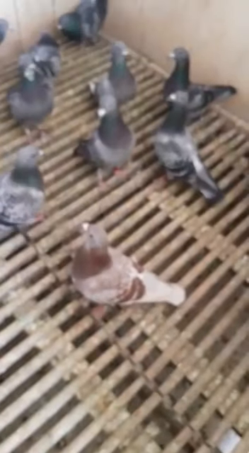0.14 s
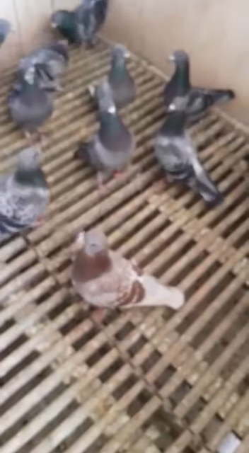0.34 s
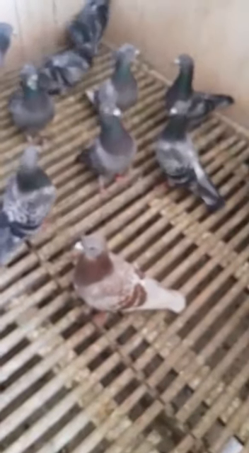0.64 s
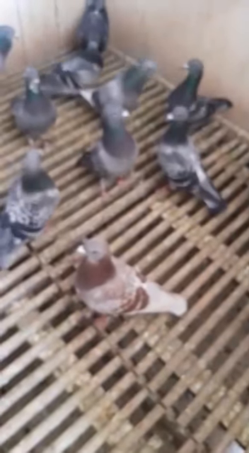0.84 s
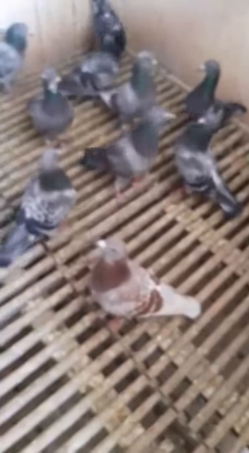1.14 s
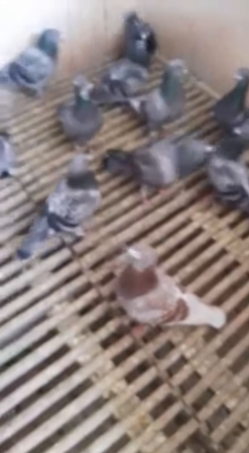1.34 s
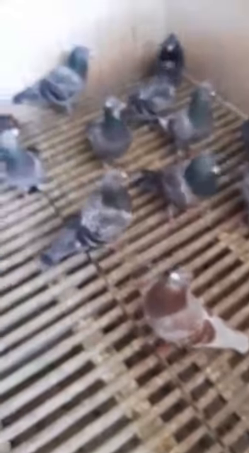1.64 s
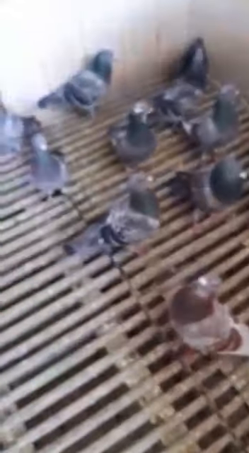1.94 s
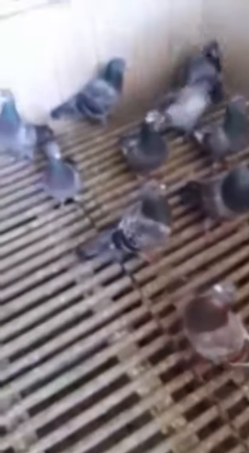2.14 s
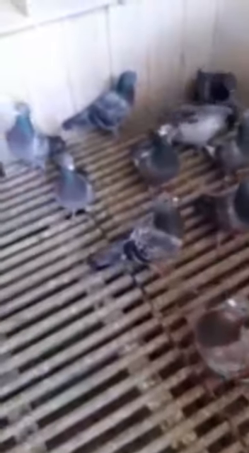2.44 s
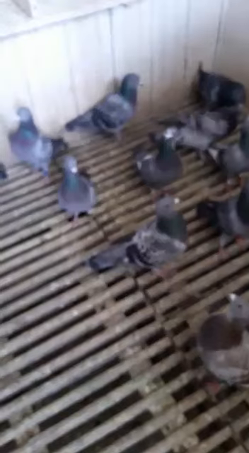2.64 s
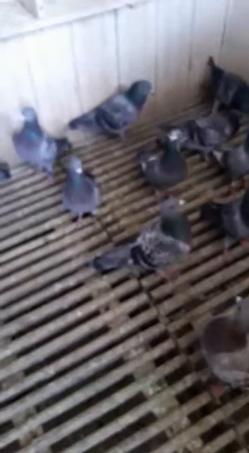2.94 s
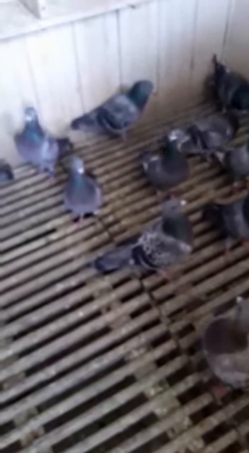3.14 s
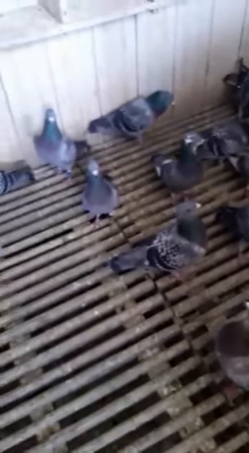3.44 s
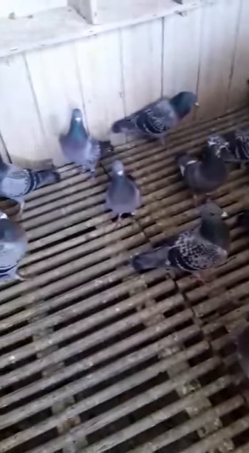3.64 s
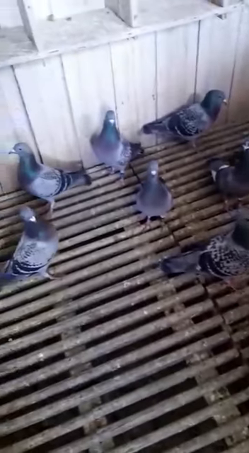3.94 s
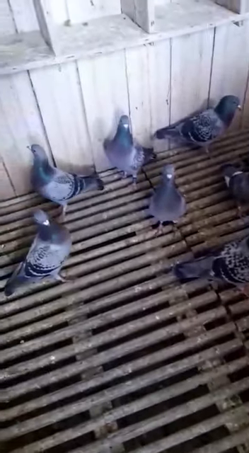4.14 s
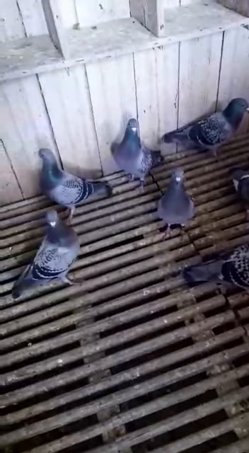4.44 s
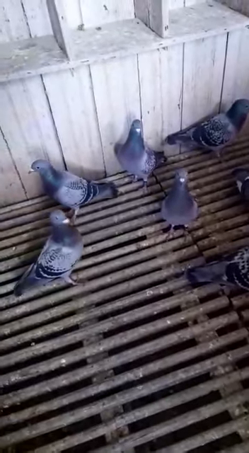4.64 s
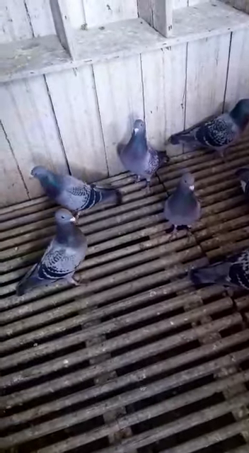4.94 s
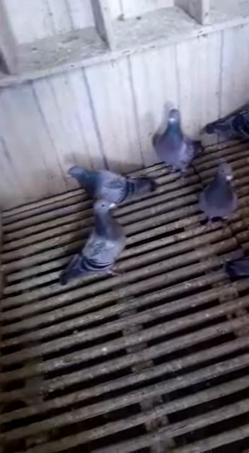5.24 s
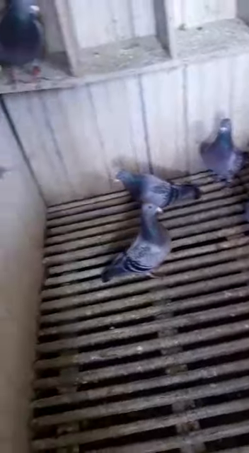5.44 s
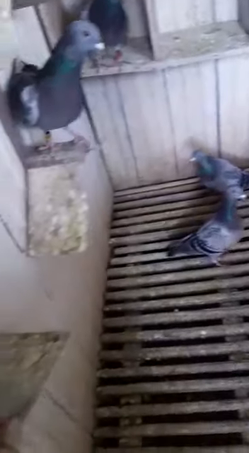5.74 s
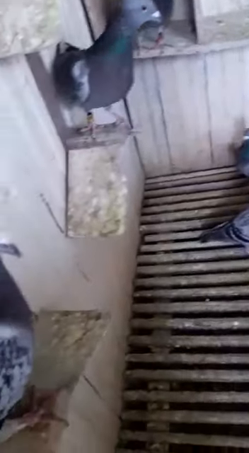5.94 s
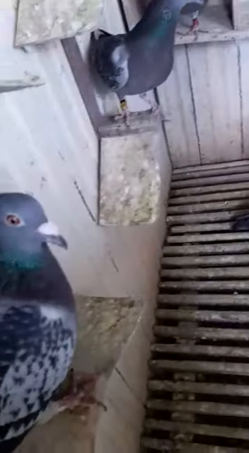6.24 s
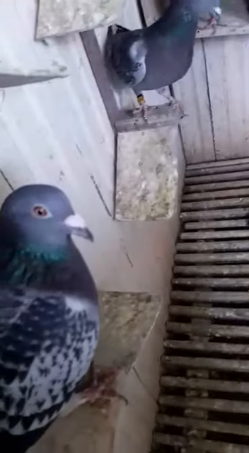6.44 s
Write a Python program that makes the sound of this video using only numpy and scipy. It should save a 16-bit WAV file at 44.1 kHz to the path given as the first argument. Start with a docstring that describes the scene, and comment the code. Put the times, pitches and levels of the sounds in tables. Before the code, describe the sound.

A flock's soft rolling coos fill a close wooden pigeon loft, with claw knocks and feather swishes thinning out midway.

```python
"""A flock of pigeons coos in a small wooden loft with a slatted floor, near two microphone ports.
From the start, separate throbbing coos (gliding sines with overtones), some throbs starting bright and
sharp, stand over a murmur of many voices; claws knock (noise and slat modes) and feathers rustle densely.
From about 3.4 s to 4.2 s knocks and rustles pause, then return sparser; bright starts recur after 6.2 s.
Throughout, the loft adds short noise tails, a faint wavering bass boom, patter and low room tone."""
import sys
import numpy as np
from scipy import signal
from scipy.fft import rfft, irfft
from scipy.io import wavfile
from scipy.ndimage import uniform_filter1d, map_coordinates

SR = 44100
rng = np.random.default_rng(int(sys.argv[2]) if len(sys.argv) > 2 else 0)


def output_pcm(signal):
    """Save a mono or channel-first signal as 16-bit PCM at the path in sys.argv[1].

    Samples are clipped to [-1, 1] before scaling.
    """
    pcm = np.clip(np.atleast_2d(signal).T, -1, 1) * 32767
    wavfile.write(sys.argv[1], SR, np.round(pcm).astype(np.int16))


N = 290883

# coos of the near birds; a held note is one throb, a rolled coo several:
# t/s, length/s, throbs, f at start/Hz, f at end/Hz, relative tone level/dB, octave re tone/dB
NEAR_COOS = [(0.042, .1, 1.92, 359.8, 285.7, -27, -1.5), (0, 0.041, 1.27, 397, 364, -24, 1),
             (.02, 0.18, 2, 202.6, 210.2, -38, -1.5), (0.093, 0.14, 1.2, 278.4, 250, -22.5, -15.5),
             (0.231, 0.13, 2.5, 269.6, 314.3, -25, -27.5), (0.36, 0.1277, 2.85, 304.4, 319.5, -24, -20),
             (0.262, 0.17, 1.75, 195.6, 207.6, -37, -10), (0.247, 0.084, 0.89, 294, 271, -33.5, 8),
             (0.728, 0.14, 3.3, 260, 328, -33.5, 5), (.5, 0.28, 2.2, 134.4, 121.5, -43, -12),
             (.66, 0.13, 2, 251.6, 251.6, -39.5, 8.5), (0.551, 0.1154, 1.9, 256, 299.3, -30.5, -3.5),
             (0.649, 0.134, 1.7, 348.4, 388.8, -31.5, 1.5), (0.842, 0.095, 1.3, 328, 274.5, -42, 11),
             (0.845, 0.037, 0.77, 287.6, 311, -27, -29), (.9, 0.15, 0.65, 275.6, 239.6, -28.5, -12.5),
             (.94, 0.079, 1.2, 252.5, 247, -46.5, 8), (0.135, 0.037, 0.92, 296, 286, -37.5, 15),
             (1.047, 0.117, 2.54, 257.6, 299.4, -25.5, -14), (1.302, 0.032, 1.15, 257.5, 310, -18, -9),
             (1.368, 0.17, 1.34, 202.9, 197, -33.5, -13), (1.39, 0.13, 1.47, 245.4, 231, -47.5, 10.5),
             (1.48, 0.22, 3.3, 360, 321, -34.5, -11), (1.618, 0.11, 2.06, 306.6, 237.8, -32, -8.5),
             (1.692, 0.058, 0.85, 408, 362, -35, 4.5), (1.697, 0.12, 3.8, 297, 313.3, -24.5, -12),
             (1.8, .1, 2, 320.7, 312, -28, -29), (1.891, 0.15, 1.1, 238, 230.4, -31.5, -1.5),
             (2.009, 0.061, 1.1, 324, 315, -32.5, -18), (2.09, 0.1, 1.5, 331.5, 317.5, -30, -16),
             (2.22, .14, 1.9, 324, 316.6, -33, -17), (2.096, 0.14, 1.54, 305.8, 304, -39.5, 5),
             (2.105, 0.154, 1.6, 369.5, 384, -47.5, 11.5), (2.328, 0.12, 1.6, 349, 361, -47, 13),
             (2.602, 0.35, 4.23, 248.3, 244.4, -40, 2), (2.329, 0.022, 0.95, 303, 334, -32, 10),
             (2.353, 0.26, 3.6, 254.6, 221, -33, -3.5), (2.535, 0.25, 4.8, 340.8, 320.7, -32, -15.5),
             (2.642, 0.25, 4.35, 222.6, 232, -34.5, -9), (2.833, 0.094, 0.78, 372, 330, -37.5, -5),
             (2.855, 0.1, 1.04, 254.3, 264, -33.5, -17), (2.963, 0.23, 4.45, 235.2, 227.2, -47, 11),
             (3.033, 0.056, 0.89, 266.4, 272.7, -27, -8), (3.077, 0.3, 4.95, 354.2, 337, -32.5, -9),
             (3.185, 0.049, 0.82, 271.3, 279.3, -25, -6.5), (3.141, 0.084, 2.4, 228.3, 279, -35.5, 4.5),
             (3.234, 0.14, 2.95, 298.8, 386.2, -35, 1.5), (3.356, 0.13, 2.53, 360.3, 288, -37.5, 6.5),
             (3.532, 0.06, 0.95, 350, 265, -32.5, 1.5), (3.395, 0.11, 1.47, 336.6, 306.3, -25.5, -9.5),
             (3.524, 0.11, 2.2, 313.4, 285.4, -27, -18), (3.683, 0.087, 2.1, 328.5, 304, -37.5, -16),
             (3.603, 0.15, 3.3, 262.9, 253.5, -36, 2), (3.739, .27, 6.7, 248.3, 232.5, -41.5, 1),
             (3.618, 0.252, 4, 255.1, 233.2, -34, -1.5), (3.978, 0.087, 0.92, 206, 208, -33, -15.5),
             (4.158, 0.038, 1.2, 231, 213, -29, -19.5), (4.175, .31, 5.5, 255.2, 240.8, -43, 4.5),
             (4.295, 0.035, 0.84, 305, 350, -30.5, -28), (4.521, 0.13, 3.05, 214, 279, -28, -20.5),
             (4.615, 0.068, 0.84, 318.3, 314, -29, -9), (4.689, 0.0707, 0.74, 342, 364, -27, -33),
             (4.502, 0.071, 0.58, 379, 318, -42, -29), (4.589, 0.11, 0.95, 505, 558, -54, 20.5),
             (4.545, 0.11, 2, 424.6, 444, -52, 9.5), (4.861, 0.11, 0.93, 404, 432, -45.5, 10),
             (4.561, 0.2, 3.1, 256.7, 264, -37.5, 0), (4.891, 0.085, 2.1, 250, 272, -29.5, -13),
             (4.95, 0.19, 3.62, 262, 249.8, -44, 6), (5.189, 0.12, 2.35, 266, 251.3, -43, 6),
             (4.988, 0.11, 1.55, 287, 303, -24.5, -27.5), (5.106, 0.072, 0.51, 298.4, 268.3, -21.5, -17),
             (5.172, 0.093, 2.03, 322.6, 289, -26, -22.5), (5.373, 0.15, 2.48, 344.2, 246.4, -30, -22),
             (5.587, 0.1126, 1.6, 262.7, 244.3, -31, -17.5), (5.451, 0.12, 1.7, 258.6, 258, -33.5, -16),
             (5.65, 0.13, 1.33, 199.1, 122, -35.5, -11.5), (5.74, 0.15, 0.57, 126, 113.7, -43, -31),
             (5.9, 0.11, 0.74, 139, 159, -42.5, -16), (5.902, 0.26, 4.4, 333.3, 335.6, -46.5, -12.5),
             (5.991, 0.07, 1, 208, 232, -43, -20), (6.061, .09, 0.75, 235.7, 233, -35, -27),
             (6.175, 0.154, 3, 351.4, 355, -42, -9), (6.186, 0.11, 2.02, 255, 345, -34.5, -15.5),
             (6.345, 0.26, 2.6, 352, 348, -38.5, -27), (6.419, 0.0766, 2.1, 236, 249, -25.5, -9),
             (6.5, 0.17, 0.77, 233, 223.2, -42, 2), (6.528, 0.062, 0.88, 268.4, 269, -27, -9),
             (6.534, 0.055, 0.83, 305, 373, -24, -40)]
# bright sharp starts of coo throbs: t/s, relative level/dB, middle of the pitch sag f/Hz
BRIGHT_THROB_STARTS = [(0.139, -23.5, 588.5), (0.244, -19.5, 577), (0.43, -17.5, 522), (0.592, -16.5, 581),
                       (0.631, -21, 583), (0.74, -28, 502), (0.83, -15, 586), (1.1, -17, 591),
                       (1.602, -22, 508), (2.108, -26, 608), (2.337, -27, 610), (3.085, -16, 528),
                       (3.244, -17, 614), (3.293, -22.5, 710), (3.34, -17.5, 530), (3.411, -17.5, 638),
                       (3.541, -24, 642), (3.616, -20, 530), (6.249, -33, 611), (6.543, -17, 503)]
# murmur of the other birds: t/s, relative tone level/dB, brightness/dB
FLOCK_LEVELS = [(0, -23, -4), (.2, -23, -7), (.5, -30.5, 3.5), (.75, -23.5, 1), (1, -31.5, 2.5),
                (1.2, -23, -1), (1.4, -37, 7.5), (1.65, -24, 4), (1.95, -30.5, -1), (2.2, -31, 6.5),
                (2.45, -32, 2), (2.8, -24.5, -7.5), (3.4, -25.5, -1.5), (3.75, -25, -1),
                (3.95, -38.5, -12.5), (4.06, -36, -9), (4.15, -41.5, -8), (4.3, -31.5, -4.5),
                (4.48, -30.5, -5.5), (4.65, -24.5, 5.5), (4.82, -26.5, -9), (5, -27.5, 0.5),
                (5.2, -35, -18), (5.34, -39.5, -0.5), (5.45, -29, -15.5), (5.7, -50.5, 15.5),
                (5.82, -66, 6), (6.05, -37, -5), (6.35, -34, -4.5), (6.6, -31, -1)]
# combined colour of the birds' crops and the loft's resonances: f/Hz, gain/dB
COO_COLOUR = [(120, -3), (190, 0.5), (260, 2), (325, 5), (420, 7), (510, 5), (700, 2), (880, -1),
              (1100, -14.5), (1500, -11.5)]
# reverberation of the loft: f/Hz, 60 dB decay time/s
LOFT_DECAY = [(150, 0.33), (500, 0.4), (1500, 0.0099)]
# left-right likeness of diffuse sound: f/Hz, shared part
CHANNEL_LIKENESS = [(60, .93), (200, .85), (400, .7), (800, .3), (1300, 0), (15000, 0)]
# claws on the slats: t/s, relative level/dB, pitch of the struck slat f/Hz, ring of the wood/dB
CLAW_KNOCKS = [(0.121, -35, 1830, -5), (.2937, -43, 2630, -6), (0.364, -37.5, 4220, 2),
               (0.423, -37.5, 4400, -3.5), (0.4713, -34, 4240, -2.5), (.5287, -38.5, 4030, 0.5),
               (0.647, -42.5, 4300, -2), (0.7476, -36, 2790, -7), (0.776, -39, 4170, -3),
               (1.022, -42, 4430, -1), (1.05, -37, 3420, -4), (1.0784, -36, 2930, 2),
               (1.183, -38.5, 1800, -2), (1.291, -53, 2290, -33), (1.394, -46, 3820, 6),
               (1.5384, -41, 2270, -17), (1.7155, -29, 2150, -3.5), (2.1414, -43, 2460, -13),
               (2.169, -36.5, 1950, 0.5), (2.26, -33, 2250, -4), (2.3344, -52.5, 1660, 16),
               (2.489, -69, 1340, 17), (2.5307, -46, 1730, -8), (2.557, -42, 1310, -4),
               (2.654, -31.5, 2120, 0), (2.665, -40, 2720, 6), (3.051, -46, 2060, 1),
               (3.158, -30.5, 2280, -5.5), (3.182, -37.5, 3460, -4), (4.209, -47, 2000, -9),
               (4.249, -49, 3760, 6), (4.466, -43, 1840, -17), (4.5999, -49, 2200, -0.5),
               (5.2056, -51, 1830, -10), (5.3637, -41, 1710, -16), (5.505, -48, 3700, 4.5),
               (5.658, -36, 1660, -10), (5.705, -46, 2430, 4.5), (6.374, -45.5, 1710, -16)]
# modes of the wooden slats: f/Hz, relative level/dB, width/Hz
SLAT_MODES = [(1320, -4, 90), (1560, -6, 90), (1750, 0, 90), (1980, 0, 90), (2170, 0, 100), (2500, -2, 120),
              (2720, -2, 130), (3250, -4, 180), (3720, -3, 180), (4060, -2, 160), (4340, -2, 160),
              (4690, -2, 160)]
# spectrum of the claw scrape: f/Hz, relative level per Hz/dB
SCRAPE_SPECTRUM = [(530, -38.5), (900, -16), (1070, 4), (1530, -5.5), (3710, -6), (8170, -25), (9000, -23),
                   (11700, -28), (19800, -120)]
# feathers brushing and shaking: t/s, relative level/dB, length/s
FEATHER_BRUSHES = [(0.001, -44.5, 0.12), (0.029, -39, 0.078), (0.204, -50, .02), (0.233, -46, 0.027),
                   (0.289, -40.5, 0.033), (0.363, -33, 0.023), (0.42, -43.5, 0.025), (0.527, -38, 0.051),
                   (0.62, -43, 0.053), (0.664, -38.5, 0.045), (0.741, -41.5, 0.027), (0.774, -36.5, 0.047),
                   (0.865, -53.5, 0.34), (1.019, -34, 0.042), (1.093, -39.5, 0.017), (1.157, -39, 0.025),
                   (1.2, -44, 0.052), (1.288, -36, 0.023), (1.397, -42.5, 0.034), (1.455, -36.5, 0.025),
                   (1.534, -45, 0.086), (1.7, -38, 0.015), (1.714, -33, 0.028), (1.772, -42.5, 0.026),
                   (2.127, -41, .012), (2.139, -37.5, 0.084), (2.167, -36, 0.026), (2.223, -43, 0.036),
                   (2.276, -34.5, 0.03), (2.567, -47, .03), (2.637, -46, .015), (2.65, -33, 0.014),
                   (2.718, -48, .02), (2.803, -41.5, 0.015), (3.043, -42, 0.053), (3.098, -36, 0.051),
                   (3.18, -37, 0.011), (3.197, -52.5, 0.21), (4.201, -51.5, 0.027), (4.247, -41.5, 0.033),
                   (4.593, -49.5, 0.051), (5.204, -45.5, 0.035), (5.316, -53.5, 0.55), (5.501, -47, 0.16),
                   (5.673, -44.5, 0.023), (5.721, -46, .02), (6.368, -45.5, 0.02), (6.428, -47, 0.04),
                   (6.571, -44.5, 0.073)]
# spectrum of the feather hiss: f/Hz, relative level per Hz/dB
FEATHER_SPECTRUM = [(900, -11), (1300, -7), (2000, -4.5), (3000, -7.5), (4500, -8), (6300, -8),
                    (8300, -15.5), (10500, -14), (12800, -10.5), (15700, -18)]
# faint thin tones: t/s, length/s, f at start/Hz, f at end/Hz, level at start/dB
FAINT_TONES = [(.42, .09, 2370, 2600, -60), (.64, .045, 2560, 2510, -53), (1.166, .1, 1770, 1730, -58),
               (2.331, .05, 1800, 1610, -52.5), (2.35, 0.064, 2040, 2100, -61),
               (2.398, 0.09, 1290, 1400, -60), (2.478, 0.14, 1640, 1830, -62),
               (2.492, .05, 1390, 1290, -56), (2.55, .11, 1350, 1390, -60), (4.45, 0.06, 5900, 5850, -67),
               (5.23, 0.11, 1195, 1210, -64)]
# small feet and feathers all over: t/s, level/dB
SHUFFLE_LEVELS = [(0.0, -46.5), (0.11, -58.5), (1.58, -55), (1.91, -59.5), (2.64, -56), (4.02, -62),
                  (4.57, -60), (6.6, -60.5)]
# spectrum of the small movements: f/Hz, relative level per Hz/dB
PATTER_SPECTRUM = [(600, -25.5), (1000, -2.5), (1550, -10.5), (2180, -9), (2600, -16.5), (3610, -14),
                   (4500, -18.5), (5500, -18.5), (8300, -28), (10500, -31.5), (13500, -23), (15700, -27.5)]
# lowest loft modes: f/Hz, width/Hz, level/dB (the first re its swell)
BOOM_MODES = [(64.4, 11, 0.5), (135.6, 33, -53), (203.5, 23, -48)]
# swell of the lowest loft mode: t/s, level/dB
LOWEST_MODE_SWELL = [(0.0, -67), (0.16, -52), (0.62, -69), (1.27, -54), (1.41, -67), (1.76, -46),
                     (1.97, -70), (2.42, -42), (2.46, -60.5), (3.55, -51.5), (3.89, -77.5), (4.57, -55.5),
                     (5.42, -71), (5.46, -52), (5.77, -74.5), (6.1, -54), (6.39, -68), (6.6, -59.5)]
# spectrum of the room tone: f/Hz, relative level per Hz/dB
AIR_SPECTRUM = [(28, -42), (45, -10.5), (90, -13), (115, -20), (170, -4), (230, -15.5), (500, -20),
                (1000, -29.5), (1400, -67.5)]
# colour of the microphone ports: f/Hz, left minus right/dB
PORT_LEAN = [(60, -2), (200, -4.5), (350, -3.2), (800, -3.5), (1200, -5), (1800, -10.5), (2800, -9),
             (4200, -6.5), (6800, -2), (8300, 12), (10800, 12), (12500, 2), (15000, 1)]

AIR_DB = -55
RISE_S, FALL_S, VALLEY = 0.016, 0.022, 0.2  # edges of a throb; amplitude left between throbs
STRAY, UNEVEN_DB = 0.015, 1.64  # scatter of pitch (a share) and of level from throb to throb
HELD_PURR = 0.2  # flutter depth in a held note
OCTAVE_DB, OCTAVE_SHARE, THIRD_DB = -4, 0.33, -6.5  # murmur overtones; the octave follows brightness in part
SNAP_S = 0.0012  # rise of a knock
SCRAPE_T60_S, DRAG_REF_DB, DRAG = 0.33, -41.5, 0.28  # softer knocks drag longer, by DRAG dB of length per dB
WOOD_T60_S = 0.26  # extra decay of the wood, on top of that of the scrape
LOFT_TOP_HZ, EDGE_HZ = 1500, 15760  # upper limits of the reverberation and of the microphones


def gain_of(db):
    """Level to amplitude: 20 dB is a factor of ten."""
    return 10 ** (np.asarray(db) / 20)


def evened(x):
    """Normalization of mean power: scales to rms 1."""
    return x / np.sqrt(np.mean(x ** 2) + 1e-20)


def read(points, hz):
    """Linear interpolation of a table on a log-frequency axis."""
    f, value = np.transpose(points)
    return np.interp(np.log(hz + 1), np.log(f + 1), value)


def curves(rows, t):
    """Linear interpolation of the columns of a time table at times t."""
    s, *columns = np.transpose(rows)
    return [np.interp(t, s, c) for c in columns]


def drift(per_s, count):
    """Slow random modulation: smooth curves of rms near 1 through about per_s random values a second."""
    knots = rng.standard_normal((count, int(N / SR * per_s) + 4))
    at = np.arange(0, N + 64, 64) / SR * per_s
    slow = [map_coordinates(k, [at], order=3) for k in knots]
    return np.array([np.interp(np.arange(N), np.arange(len(at)) * 64, k) for k in slow])


def likened(first, second, hz):
    """Partial coherence: mixes two independent spectra into a left-right pair."""
    same = np.clip(read(CHANNEL_LIKENESS, hz), -1, 1)[:, None]
    return np.array([first, same * first + np.sqrt(1 - same ** 2) * second])


def noise(spectrum, size, patchy_db=0.0):
    """Filtered Gaussian noise: two channels, rms 1, with patches that drift in time and frequency."""
    frames, hz = N // (size // 4) + 5, np.fft.rfftfreq(size, 1 / SR)
    a, b, c, d, patches = rng.standard_normal((frames, len(hz), 5)).T
    patches = uniform_filter1d(patches, size=6, axis=0)
    patches = evened(uniform_filter1d(patches, size=10, axis=1))
    z = likened(a + 1j * b, c + 1j * d, hz)
    z *= gain_of(read(spectrum, hz)[:, None] + patchy_db * patches)
    return evened(signal.istft(z, nperseg=size, noverlap=size * 3 // 4)[1][:, :N])


def near_birds(purr=0.57, slowest_purr_hz=47.988, purr_span_hz=25.048, wobble=0.015,
               third_db=-15, pan_db=-1.0, lag_s=0.0006):
    """Amplitude modulation of gliding near-sines: throbs, and a quick crop flutter, deepest in a roll."""
    out, shake = np.zeros((2, N)), drift(70, count=1)[0]
    chances, scatter = rng.random((len(NEAR_COOS), 3)), rng.standard_normal((len(NEAR_COOS), 2, 12))
    for coo, (phase, rate, place), (sharp, loud) in zip(NEAR_COOS, chances, scatter):
        s, length, throbs, hz0, hz1, tone_db, octave_db = coo
        at = round(s * SR)
        t = np.arange(min(round(length * SR), N - at)) / SR
        beat = t / length * max(throbs, 1)
        which, rolled = beat.astype(int), throbs > 1.5

        unsteady = 1 + wobble * shake[at:at + len(t)] + rolled * STRAY * sharp[which]
        hz = (hz0 + (hz1 - hz0) * t / length) * unsteady
        side = np.array([[.5], [-.5]]) * (2 * place - 1)  # sets delay and level between the ports
        lag = side * lag_s * uniform_filter1d(hz, size=400)
        turn = 2 * np.pi * (np.cumsum(hz) / SR + phase + lag)
        overtones = np.sin(2 * turn) + gain_of(third_db) * (np.sin(3 * turn) + 0.32 * np.sin(4 * turn))
        voice = np.sin(turn) + gain_of(octave_db) * overtones

        into, span = beat % 1, length / max(throbs, 1)
        ends = np.minimum(t / RISE_S, (length - t) / FALL_S)
        gaps = np.minimum(into * span / RISE_S, (1 - into) * span / FALL_S)
        ends, gaps = np.sin(np.pi / 2 * np.clip(np.array([ends, gaps]), 0, 1)) ** 2
        effort_db = rolled * UNEVEN_DB * uniform_filter1d(loud[which], size=400)
        swell = np.minimum(ends, VALLEY + (1 - VALLEY) * gaps) * gain_of(tone_db + effort_db)
        purr_hz = slowest_purr_hz + purr_span_hz * rate
        flutter = 1 + (purr if rolled else HELD_PURR) * np.cos(2 * np.pi * (purr_hz * t + rate))
        out[:, at:at + len(t)] += np.sqrt(2) * voice * swell * flutter * gain_of(pan_db * side)
    return out


def bright_starts(level_db=-6, rise_s=0.0016, t60_s=0.1, sag=0.1, low_db=-9, lag_s=0.00044):
    """Transient excitation: a sharp tone sags in pitch and dies quickly, with its half frequency beneath."""
    out, t = np.zeros((2, N)), np.arange(SR // 8) / SR
    chances = rng.random((len(BRIGHT_THROB_STARTS), 2))
    for (s, db, hz), (phase, place) in zip(BRIGHT_THROB_STARTS, chances):
        at = round(s * SR)
        side = np.array([[.5], [-.5]]) * (2 * place - 1)
        sagging_hz = hz * (1 + sag * (np.exp(-t / .012) - .5))
        turn = 2 * np.pi * (np.cumsum(sagging_hz) / SR + phase + side * lag_s * hz)
        level = gain_of(db + level_db - 60 * t / t60_s) * (1 - np.exp(-t / rise_s))
        start = level * (np.sin(turn) + gain_of(low_db) * np.sin(turn / 2))
        out[:, at:at + len(t)] += start[:, :N - at]
    return out


def flock(count=14, centre_hz=270, spread=0.19, throb_hz=19, throb_fall_db=18.0, scatter=0.2,
          effort_db=4.0, purr_db=4.0):
    """Superposition of independent voices: each glides, flutters and throbs with fast starts that sink."""
    hz = centre_hz * np.exp(spread * drift(5, count=count) + 0.00987 * drift(60, count=count))
    turn = 2 * np.pi * np.cumsum(hz, axis=1) / SR
    rate_hz = throb_hz * np.exp(scatter * drift(4, count=count))
    into = (np.cumsum(rate_hz, axis=1) / SR + rng.random((count, 1))) % 1
    throbs = uniform_filter1d(gain_of(-throb_fall_db * into), size=200, axis=1)
    effort = throbs * gain_of(effort_db * drift(6, count=count) + purr_db * drift(110, count=count))
    tone, octave, third = (evened((effort * np.sin(k * turn)).sum(0)) for k in (1, 2, 3))
    tone_db, bright_db = curves(FLOCK_LEVELS, np.arange(N) / SR)
    octave_db, high_db = OCTAVE_DB + OCTAVE_SHARE * bright_db, THIRD_DB + bright_db
    return gain_of(tone_db) * (tone + gain_of(octave_db) * octave + gain_of(high_db) * third)


def loft(x, places=3, moves_hz=1.5):
    """Reverberation by convolution: decaying noise tails, one a place, with cyclically shifting shares."""
    out = np.zeros((2, N))
    for k in range(places):
        hz, t, z = signal.stft(rng.standard_normal((2, SR // 2)), SR, nperseg=256)
        z = likened(z[0], z[1], hz) * gain_of(-60 * t / read(LOFT_DECAY, hz)[:, None])
        tail = signal.istft(z * (hz[:, None] < LOFT_TOP_HZ), SR, nperseg=256)[1]
        tail = tail / np.linalg.norm(tail, axis=1, keepdims=True) * np.sqrt(LOFT_TOP_HZ / (SR / 2))
        share = np.sqrt(2 / places) * np.cos(2 * np.pi * (moves_hz * np.arange(N) / SR + k / places))
        out += signal.fftconvolve((share * x)[None], tail, axes=1)[:, :N]
    return out


def claws(scrape_db=-12, ring_db=-6, reach=0.078, stray=0.046, under=0.62, under_share=0.25):
    """Forced resonance: an uneven scrape, and slat modes driven near the struck pitch and a lower partner."""
    t = np.arange(SR // 3) / SR
    power, drive = np.zeros(N), np.zeros((len(SLAT_MODES), N))
    hz, mode_db, width = np.transpose(SLAT_MODES)
    chances = rng.random((len(CLAW_KNOCKS), len(SLAT_MODES)))
    for (s, db, struck_hz, wood_db), chance in zip(CLAW_KNOCKS, chances):
        at = round(s * SR)
        fade_db = -60 * t / SCRAPE_T60_S * gain_of(DRAG * (db - DRAG_REF_DB))
        tail = ((gain_of(db + fade_db) * (1 - np.exp(-t / SNAP_S))) ** 2)[:N - at]
        power[at:at + len(t)] += tail
        struck = np.exp(-(np.log(hz / struck_hz) / reach) ** 2)
        partner = under_share * np.exp(-(np.log(hz / struck_hz / under) / reach) ** 2)
        share = struck + partner + stray * chance ** 3
        wood = gain_of(wood_db - 60 * t[:len(tail)] / WOOD_T60_S) ** 2  # wood dies sooner than the scrape
        drive[:, at:at + len(t)] += share[:, None] * tail * wood
    ring = np.zeros((2, N))
    for f, db, w, d in zip(hz, mode_db, width, drive):
        turn = 2 * np.pi * f * np.arange(N) / SR
        a, b, c, e = drift(w, count=4)  # a noise-driven mode wavers
        wavering = np.array([a, c]) * np.sin(turn) + np.array([b, e]) * np.cos(turn)
        ring += gain_of(db) * np.sqrt(d) * wavering
    scrape = np.sqrt(power) * noise(SCRAPE_SPECTRUM, size=256) * gain_of(2.45 * drift(250, count=1))
    return gain_of(scrape_db) * scrape + gain_of(ring_db) * ring


def feathers(rustle_db=-9, rise_s=0.0021, t60_s=0.29, flick=1.15, flick_s=0.0031):
    """Friction noise: shaped hiss starts with a flick, sinks about 6 dB over its length, then dies away."""
    t, power = np.arange(SR // 3) / SR, np.zeros(N)
    for s, db, length in FEATHER_BRUSHES:
        at = round(s * SR)
        fade_db = -6 * t / max(length, .005) - 60 * np.maximum(t - length, 0) / t60_s
        onset = (1 - np.exp(-t / rise_s)) * (1 + flick * np.exp(-t / flick_s))
        power[at:at + len(t)] += ((gain_of(db + fade_db) * onset) ** 2)[:N - at]
    flutter = gain_of(rustle_db + 2.0 * drift(200, count=1)[0])
    return flutter * np.sqrt(power) * noise(FEATHER_SPECTRUM, size=256, patchy_db=2.5)


def thin_tones(rise_s=0.008, fade_db=-8, waver=0.0053, waver_db=3):
    """Simple harmonic tones: each a gliding, slightly unsteady sine that fades."""
    out, (shake, flicker) = np.zeros(N), drift(40, count=2)
    for s, length, hz0, hz1, db in FAINT_TONES:
        at, t = round(s * SR), np.arange(round(length * SR)) / SR
        hz = (hz0 + (hz1 - hz0) * t / length) * (1 + waver * shake[at:at + len(t)])
        level = gain_of(db + fade_db * t / length + waver_db * flicker[at:at + len(t)])
        edges = np.clip(np.minimum(t, length - t) / rise_s, 0, 1)
        out[at:at + len(t)] += level * edges * np.sin(2 * np.pi * np.cumsum(hz) / SR)
    return np.sqrt(2) * out


def shuffle():
    """Merging of many small movements into noise: a faint flickering patter."""
    level_db = curves(SHUFFLE_LEVELS, np.arange(N) / SR)[0] + 0.5 * drift(30, count=1)[0]
    return gain_of(level_db) * noise(PATTER_SPECTRUM, size=512, patchy_db=2.5)


def boom():
    """Resonance under random forcing: noise keeps the lowest loft modes wavering."""
    t, modes = np.arange(N) / SR, []
    for hz, width, db in BOOM_MODES:
        r, turn = np.exp(-np.pi * width / SR), np.exp(2j * np.pi * hz * t)
        low = rng.standard_normal(N) / turn  # shifted down to 0 Hz, smoothed twice, shifted back
        for _ in range(2):
            low = signal.lfilter([1 - r], [1, -r], low)
        modes.append(gain_of(db) * evened((turn * low).real))
    return gain_of(curves(LOWEST_MODE_SWELL, t)[0]) * modes[0] + sum(modes[1:])


def air():
    """Broadband background: low room tone as filtered noise."""
    return gain_of(AIR_DB) * noise(AIR_SPECTRUM, size=2048, patchy_db=2.0)


def scene():
    """Superposition of all layers; all coos and their echoes pass through the colour of crop and loft."""
    near, far = near_birds() + bright_starts(), flock()
    echoes = loft(gain_of(-13.5) * near.mean(0) + gain_of(-13) * far)
    coos = gain_of(-4.0) * near + gain_of(-15) * far + echoes
    coos = irfft(rfft(coos) * gain_of(read(COO_COLOUR, np.fft.rfftfreq(N, 1 / SR))), N)
    return coos + claws() + feathers() + thin_tones() + shuffle() + boom() + air()


def record(dry):
    """Linear filtering: each microphone port has its own colour; then the band limit."""
    lean_db = read(PORT_LEAN, np.fft.rfftfreq(N, 1 / SR)) / 2  # half to each port
    ports = irfft(rfft(dry) * gain_of([lean_db, -lean_db]), N)
    band_limit = signal.firwin(2047, EDGE_HZ, window=("kaiser", 9), fs=SR)
    return signal.oaconvolve(ports, band_limit[None], "same")


dry = scene()
out = record(dry)
output_pcm(out)
```